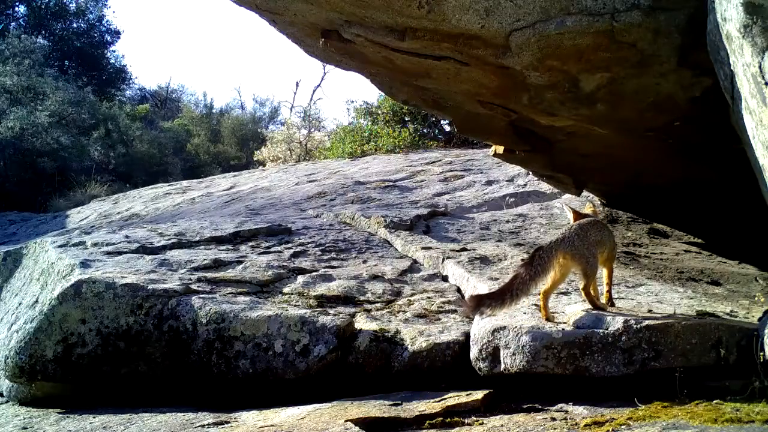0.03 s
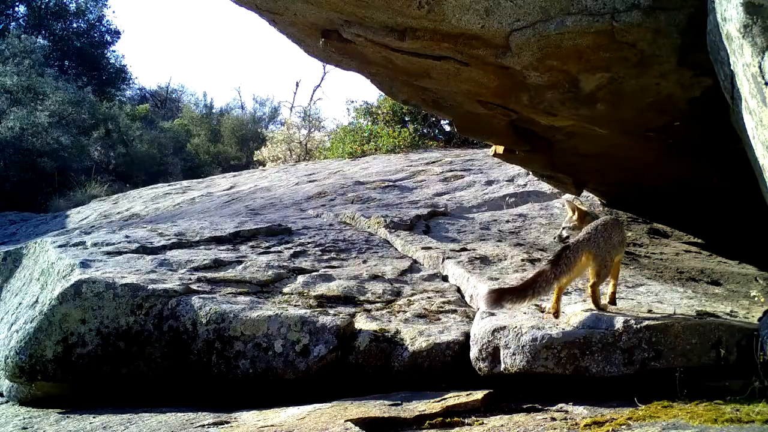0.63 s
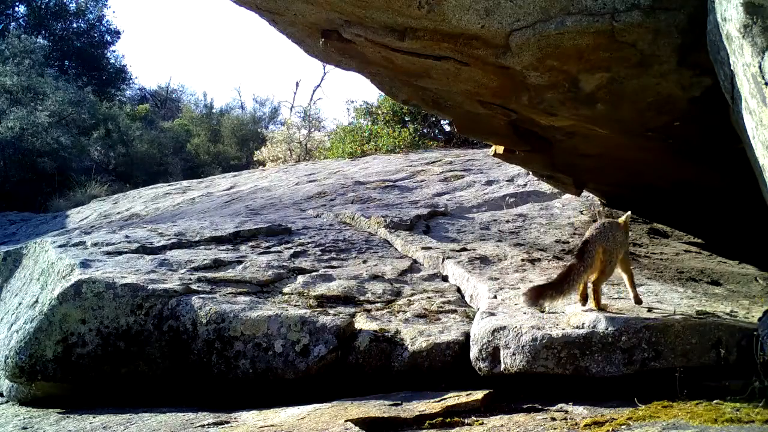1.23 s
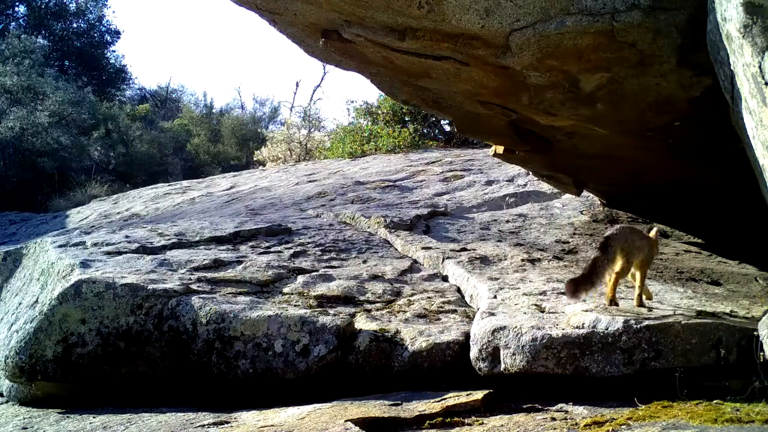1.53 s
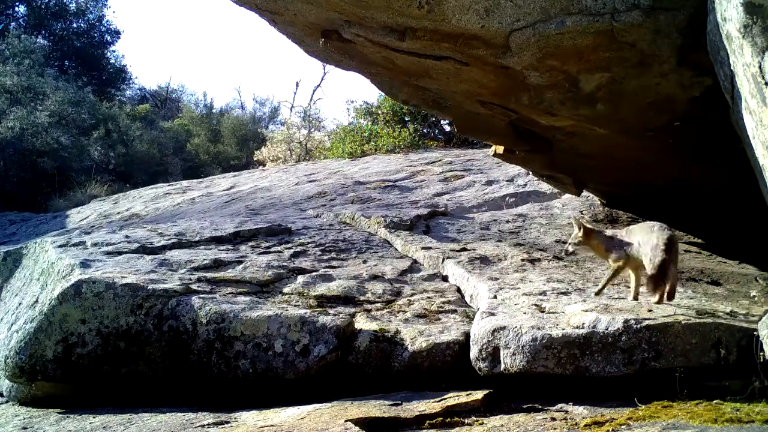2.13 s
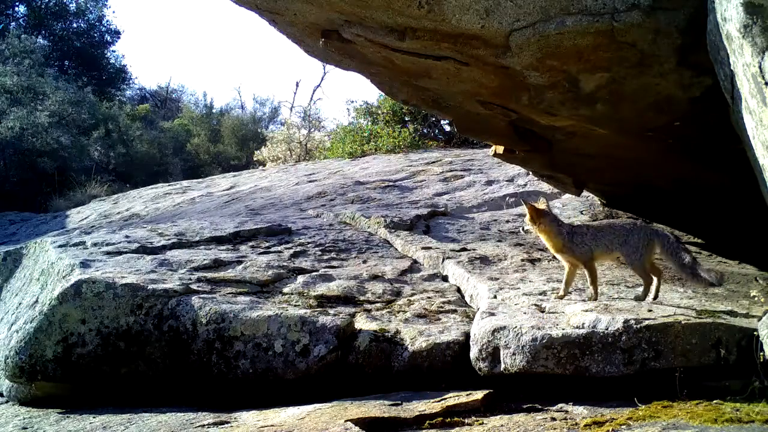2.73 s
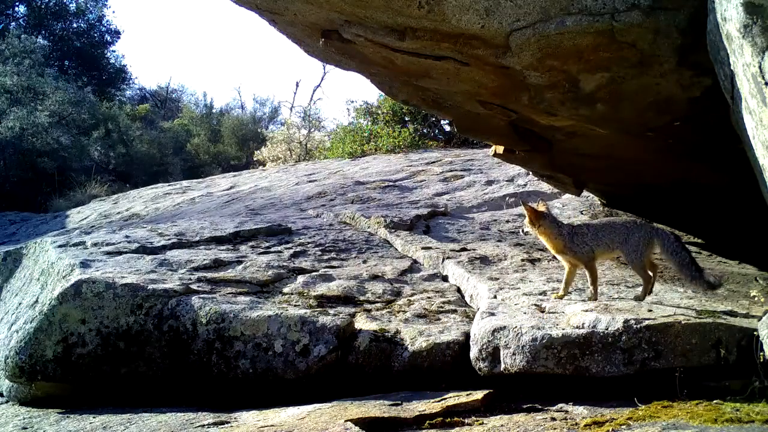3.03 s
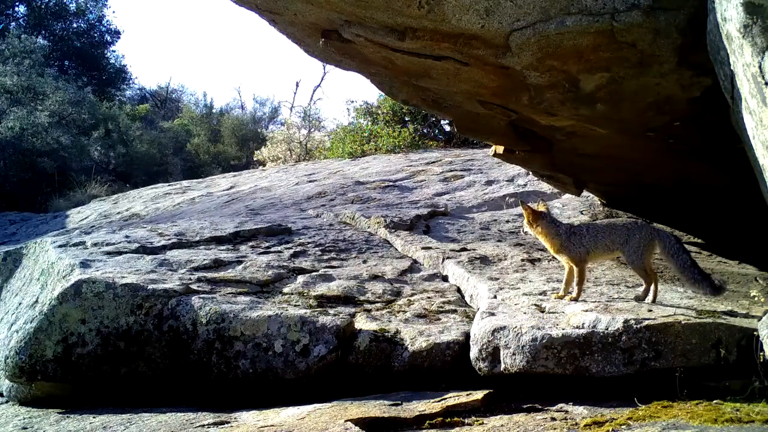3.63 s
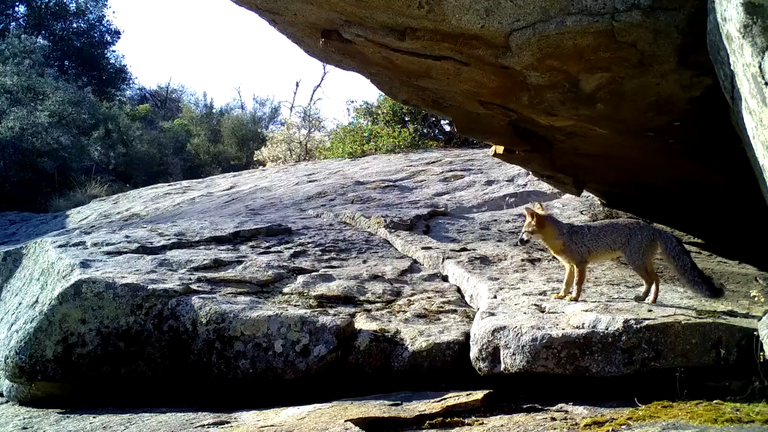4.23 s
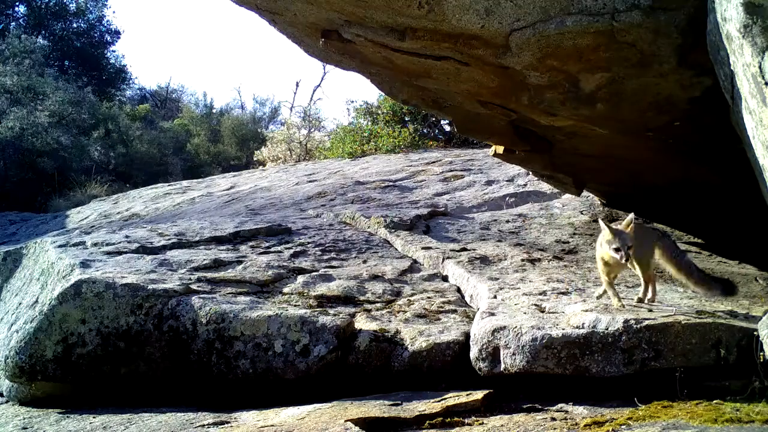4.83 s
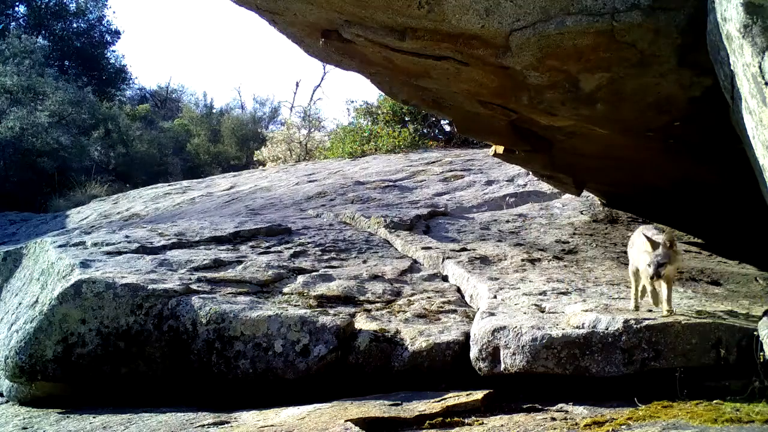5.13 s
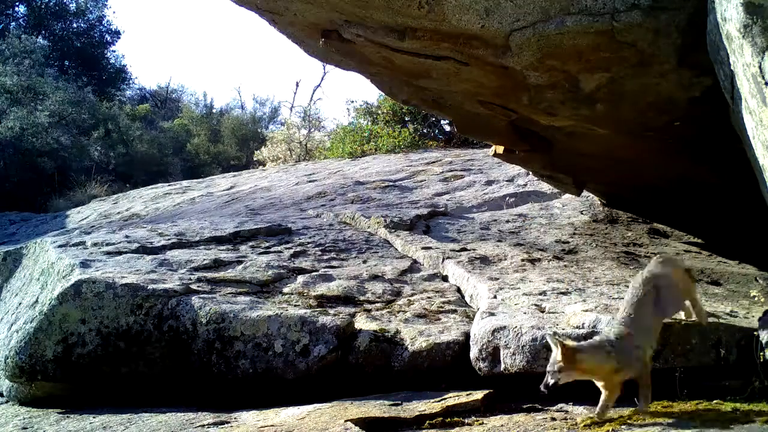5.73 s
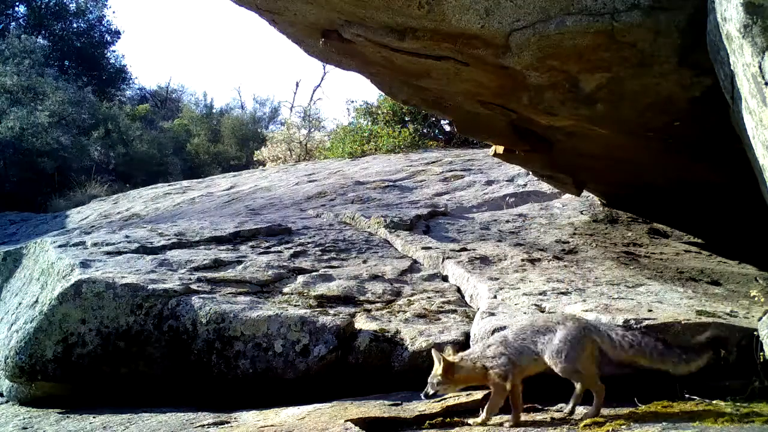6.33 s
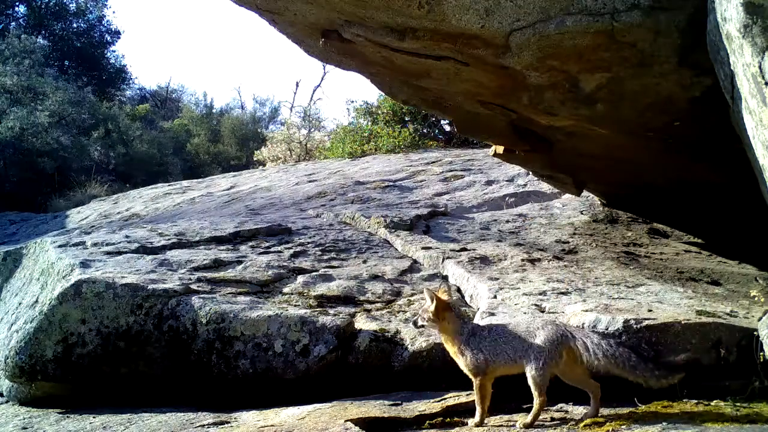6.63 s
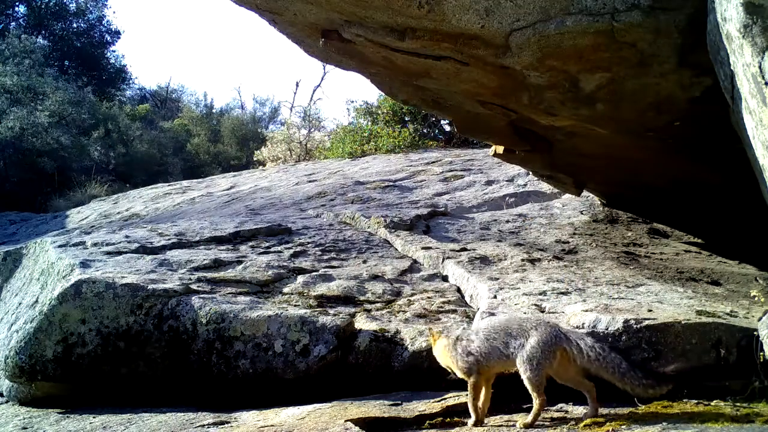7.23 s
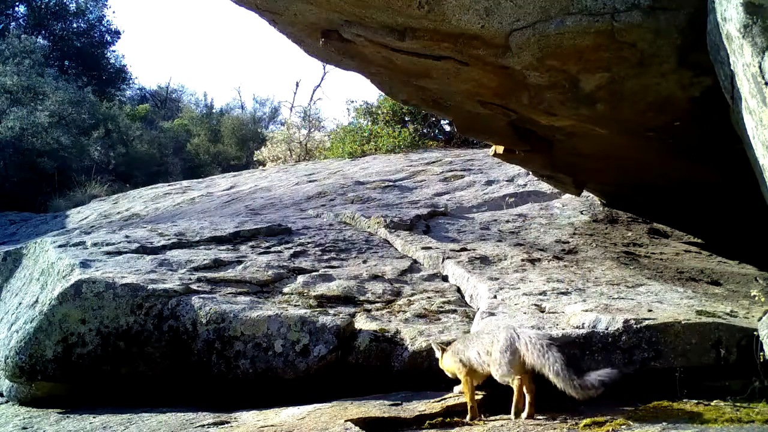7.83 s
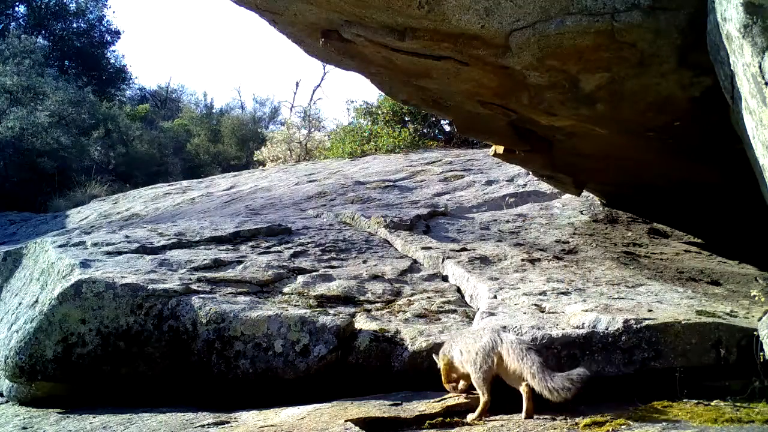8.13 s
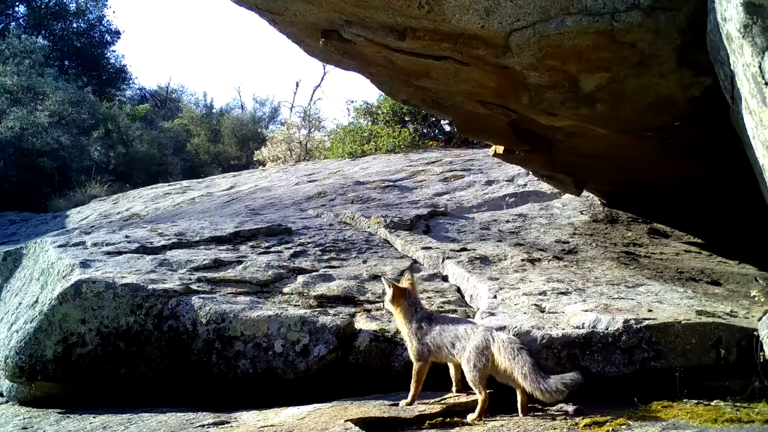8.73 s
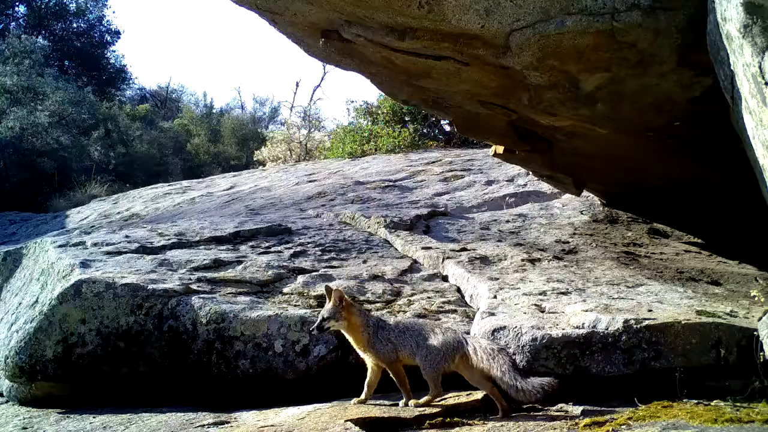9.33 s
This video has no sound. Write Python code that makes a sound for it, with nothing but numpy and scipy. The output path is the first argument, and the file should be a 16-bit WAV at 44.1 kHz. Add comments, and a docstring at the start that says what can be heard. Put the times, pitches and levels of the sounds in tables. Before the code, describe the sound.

A ground squirrel repeats piercing, squeaky alarm chirps about once a second among rocks, while a fox's claws briefly scrape stone.

```python
"""A ground squirrel hidden among boulders gives alarm calls. Each is a piercing whistle that flips
up into a squeal as the voice breaks, followed by two softer notes that swoop down and back up.
The rocks throw the calls back, and they overload the microphone. A fox scrabbles down a ledge,
its claws catching and dragging grit. Far birds chirp and the air rumbles softly."""
import sys
import numpy as np
from scipy import signal
from scipy.fft import rfft, irfft
from scipy.io import wavfile
from scipy.ndimage import uniform_filter1d

SR = 44100
rng = np.random.default_rng(int(sys.argv[2]) if len(sys.argv) > 2 else 0)


def int16_out(signal):
    """Quantize to a 16-bit WAV file."""
    q = np.round(np.clip(np.atleast_2d(signal).T, -1, 1) * 32767)
    wavfile.write(sys.argv[1], SR, q.astype(np.int16))


N = 414540

# tone of the hillside air, from rumble to hiss: (frequency [Hz], relative level [dB])
AIR_SPECTRUM = [(12, -33.5), (20, 0.5), (240, -8.5), (300, -10.5), (355, -11.5), (444, -13), (482, -14),
                (674, -18), (843, -20), (1560, -27), (3810, -35.5), (5790, -36.5), (7230, -40),
                (14500, -44), (15800, -46.5)]
# far bird chirps: (time [s], start pitch [Hz], end pitch [Hz], relative level [dB])
BIRD_CHIRPS = [(.858, 6100, 5000, -57.5), (4.004, 4100, 3930, -55), (4.425, 5600, 6050, -56),
               (6.42, 3750, 3440, -53), (7.008, 6350, 5140, -52), (7.535, 3740, 3560, -49),
               (7.589, 3680, 3500, -52)]
# claws catching on the ledge: (time [s], relative level [dB])
CLAW_CATCHES = [(5.4912, -22), (5.5277, -37), (5.5666, -37), (5.5825, -26), (5.6007, -21), (5.6574, -36),
                (5.7067, -38), (5.748, -36)]
# tone of grit scraping on stone: (frequency [Hz], relative level [dB])
GRIT_SPECTRUM = [(1500, -30), (3000, -17.5), (5400, -6), (6300, 0.5), (7200, -8), (10000, -14.5),
                 (12000, -23), (15000, -31)]
# echoes from the rock faces: (delay [s], relative level [dB])
ROCK_ECHOES = [(.0032, -8.5), (.033, -28), (.063, -21)]
# tone of the crack in the voice: (frequency [Hz], relative level [dB])
CRACK_SPECTRUM = [(250, -21.5), (600, -5), (1500, -5.5), (3500, -5), (5000, -1), (9000, -12)]
# how a swoop swells and fades: (share of its length [0 to 1], relative level [dB])
SWOOP_LOUDNESS = [(0, -14), (.08, 2), (.2, -3.5), (.54, -7.5), (.68, -10.5), (.9, -15.5), (1, -30)]
# the swoop that ends each call: (length [s], start pitch [Hz], dip pitch [Hz], end pitch [Hz])
LAST_SWOOP = (.06, 9000, 5650, 7700)
# the squirrel's calls, with relative levels: (time [s], whistle length [s], whistle middle pitch [Hz],
# whistle end pitch [Hz], squeal pitch [Hz], whistle and squeal level [dB], crack level [dB],
# first swoop's dip pitch [Hz], first swoop level [dB], last swoop level [dB])
ALARM_CALLS = [(.264, .039, 4712, 4970, 10600, -4, -19, 7000, -11, -44),
               (1.371, .039, 4724, 4874, 10240, -3.5, -18, 7020, -12, -49),
               (2.497, 0.042, 4746, 4846, 10590, -3, -23.5, 6950, -14.5, -49),
               (3.503, .041, 4577, 4822, 10610, -5, -21, 7000, -15.5, -44),
               (4.588, 0.042, 4640, 4680, 10630, -6, -20, 7080, -16, -52),
               (5.967, .045, 4740, 4570, 10340, -2, -16.5, 6260, -4, -23),
               (7.099, .042, 4570, 4460, 10060, -3.5, -29.5, 6500, -13.5, -50.5),
               (8.286, .042, 4614, 4470, 9700, -2.5, -24.5, 6490, -6.5, -27),
               (9.264, 0.046, 4660, 4660, 10060, -4, -20.5, 5850, -11.5, -45)]

USUAL_SWOOP_DB, USUAL_DIP_HZ = -12, 6910   # an ordinary swoop; "push" is how many dB louder one is


def from_db(db):
    """Turn decibels into a number to multiply a sound by."""
    return 10 ** (np.asarray(db) / 20)


def unit_level(x):
    """Scale a sound so that its average strength (rms) is 1."""
    return x / np.sqrt(np.mean(x ** 2) + 1e-20)


def add(out, at_s, sound):
    """Mix a sound into out, starting at the given time."""
    place = out[max(round(at_s * SR), 0):][:len(sound)]
    place += sound[:len(place)]


def band(x, low_hz, high_hz):
    """Gently turn down everything outside a range of frequencies."""
    edges_hz = [low_hz, min(high_hz, .45 * SR)]
    return signal.sosfilt(signal.butter(2, edges_hz, "band", fs=SR, output="sos"), x)


def coloured(x, spectrum):
    """Shape a sound's lows and highs by a table, then scale it to strength 1."""
    hz, db = np.transpose(spectrum)
    bin_hz = np.maximum(np.fft.rfftfreq(len(x), 1 / SR), 1)
    gain = from_db(np.interp(np.log(bin_hz), np.log(hz), db))
    return unit_level(irfft(rfft(x) * gain, len(x)))


def wobble(size, per_s):
    """Drift between random values, mostly from -1 to 1, per_s times a second."""
    points = rng.standard_normal(4096)
    return np.interp(np.arange(size) / SR * per_s % len(points), np.arange(len(points)), points)


def voice_phase(hz, jitter, jitter_per_s=900, glide_s=.004):
    """Smooth a pitch and let it tremble by the share jitter; the sine of the result is a tone."""
    smooth_hz = uniform_filter1d(hz, max(int(glide_s * SR), 1), mode="nearest")
    return 2 * np.pi * np.cumsum(smooth_hz * (1 + jitter * wobble(len(hz), jitter_per_s))) / SR


def fade_ends(x, share):
    """Fade in and out; the two fades together take this share of the sound."""
    return x * signal.windows.tukey(len(x), share)


def air(level_db=-40):
    """The soft rumble and hiss of the open hillside."""
    return from_db(level_db) * coloured(rng.standard_normal(N), AIR_SPECTRUM)


def birds(chirp_s=.032, distance_db=-2, octave_db=-6):
    """Thin, far-off chirps; the lower ones also carry a tone an octave up."""
    out = np.zeros(N)
    for at_s, start_hz, end_hz, db in BIRD_CHIRPS:
        phase = voice_phase(np.linspace(start_hz, end_hz, int(chirp_s * SR)), jitter=.016)
        tone = np.sin(phase) + from_db(octave_db) * (start_hz < 3800) * np.sin(2 * phase)
        add(out, at_s, from_db(db + distance_db) * fade_ends(tone, .5))
    return out


def fox(grains_per_s=6000, claw_db=-10, claw_fade_s=.02, slide_db=-47, slide_fade_s=.22):
    """Each claw catches with a scratch, then the paw drags grit over stone, more after a hard catch."""
    t = np.arange(SR // 2) / SR
    grains = rng.standard_normal(N) * (rng.random(N) < grains_per_s / SR)
    hardest_db = max(db for _, db in CLAW_CATCHES)
    force = np.zeros(N)
    for at_s, db in CLAW_CATCHES:
        add(force, at_s, from_db(db + claw_db - 60 * t / claw_fade_s))
        add(force, at_s, from_db(slide_db + .46 * (db - hardest_db) - 60 * t / slide_fade_s))
    return force * coloured(grains, GRIT_SPECTRUM)


def rocks(x, near_db=-17, near_fade_s=.23, far_db=-47, far_delay_s=.15, far_spread_s=.28):
    """Sound scatters among boulders, echoes off rock faces and returns faintly from a wooded slope."""
    t = np.arange(SR) / SR
    near = band(rng.standard_normal(SR), 1700, 11000) * from_db(-60 * t / near_fade_s)
    far = band(rng.standard_normal(SR), 2000, 4800) * np.exp(-((t - far_delay_s) / far_spread_s) ** 2)
    scatter = (from_db(near_db) * unit_level(near) + from_db(far_db) * unit_level(far)) / np.sqrt(SR)
    echoes = np.zeros(SR)
    for delay_s, db in ROCK_ECHOES:
        echoes[round(delay_s * SR)] += from_db(db)
    dull_echoes = band(echoes, 300, 5800)
    return x + signal.fftconvolve(x, scatter + dull_echoes)[:N]


def pip(hz, length_s=.028, sag_hz=330, flutter_db=3):
    """A thin, slightly falling tone that swells and stops."""
    progress = np.linspace(0, 1, int(length_s * SR))
    level_db = np.interp(progress, [0, .52, 1], [-5, 1, -13]) + flutter_db * wobble(len(progress), 245)
    tone = np.sin(voice_phase(hz - sag_hz * progress, jitter=.014))
    return fade_ends(tone * from_db(level_db), .2)


def grunt(rasp_share, length_s=.025, from_hz=2900, to_hz=3900, rasp_db=-6):
    """A second, lower voice that rises a little, mixed with raspy noise."""
    size = int(length_s * SR)
    tone = np.sin(voice_phase(np.linspace(from_hz, to_hz, size), jitter=.077, jitter_per_s=2000))
    rasp = from_db(rasp_db) * unit_level(band(rng.standard_normal(size), 1000, 4200))
    return fade_ends((1 - rasp_share) * tone + rasp_share * rasp, .5)


def swoop(length_s, start_hz, dip_hz, end_hz, dip_jitter, flutter_db=4):
    """A high note sags, turning rough and fluttery, and climbs again as it fades."""
    progress = np.linspace(0, 1, int(length_s * SR))
    path_hz = [start_hz, .78 * start_hz + .22 * dip_hz, dip_hz,
               dip_hz, .12 * dip_hz + .88 * end_hz, end_hz]
    hz = np.interp(progress, [0, .2, .45, .58, .82, 1], path_hz)
    depth = np.clip(4 * (1 - dip_hz / start_hz), 0, 1)
    roughness = depth * np.interp(progress, [.1, .24, .42, .7, .9], [.058, 1, .96, .87, .1])
    tone = np.sin(voice_phase(hz, .0099 + dip_jitter * roughness, jitter_per_s=2400))
    level_db = np.interp(progress, *np.transpose(SWOOP_LOUDNESS))
    level_db += flutter_db * roughness * wobble(len(progress), 600)
    return fade_ends(tone * from_db(level_db), .05)


def after_note(length_s, start_hz, dip_hz, end_hz, db, grunt_db, dip_jitter, rasp_share):
    """A swoop with a grunt under it and a pip after it; both partly follow its loudness."""
    push_db = db - USUAL_SWOOP_DB
    out = np.zeros(SR // 2)
    add(out, 0, from_db(db) * swoop(length_s, start_hz, dip_hz, end_hz, dip_jitter))
    add(out, .011, from_db(grunt_db + .74 * push_db) * grunt(rasp_share))
    pip_at_s = .064 + .0004 * push_db
    pip_hz = 7450 + .25 * (dip_hz - USUAL_DIP_HZ)
    add(out, pip_at_s, from_db(-27 + .69 * push_db) * pip(pip_hz))
    return out


def crack(length_s=.017):
    """A short burst of noise as the voice flips into its high range."""
    size = int(length_s * SR)
    return coloured(rng.standard_normal(SR // 10), CRACK_SPECTRUM)[:size] * np.hanning(size)


def squeal(from_hz, top_hz, flip_s=.013, hold_s=.017, flutter_db=6.5):
    """The broken voice shoots up about an octave, rough on the way, and clears as it fades."""
    t = np.arange(int((flip_s + hold_s) * SR)) / SR
    stages_s = [0, .55 * flip_s, flip_s, flip_s + hold_s / 2, t[-1]]
    hz = np.interp(t, stages_s, [1.08 * from_hz, .77 * top_hz, .945 * top_hz, top_hz, top_hz])
    roughness = np.interp(t, stages_s, [.96, 1, .2, 0, 0])
    level_db = np.interp(t, stages_s, [-13, -2.5, -1, -6, -22])
    level_db += flutter_db * roughness * wobble(len(t), 1200)
    tone = np.sin(voice_phase(hz, jitter=.0095 + .13 * roughness, jitter_per_s=3000))
    return fade_ends(tone * from_db(level_db), .08)


def whistle(length_s, middle_hz, end_hz, start_hz=4150, rise_s=.0057, tail_s=.018,
            flutter_db=4, octave_db=-17.5, rasp_db=-31):
    """A piercing tone that scoops up, trembles, then dies away as the voice breaks."""
    t = np.arange(int((length_s + tail_s) * SR)) / SR
    path_hz = [.99 * start_hz, start_hz, .2 * start_hz + .8 * middle_hz,
               middle_hz, (middle_hz + end_hz) / 2, end_hz]
    hz = np.interp(t / length_s, [0, .11, .24, .42, .8, 1], path_hz)
    phase = voice_phase(hz, jitter=.011, jitter_per_s=1200)
    rasp = from_db(rasp_db) * unit_level(band(rng.standard_normal(len(t)), 3000, 10000))
    tone = np.sin(phase) + from_db(octave_db) * np.sin(2 * phase) + rasp
    level_db = np.interp(t, [0, rise_s, .92 * length_s, length_s, t[-1]], [-15, 3, 3, -5, -17])
    level_db += flutter_db * wobble(len(t), 350)
    return fade_ends(tone * from_db(level_db), .05)


def squirrel(pause_s=.0565, stutter_s=.094):
    """Each alarm is a whistle that cracks into a squeal, then stutters on in two ever softer notes."""
    out = np.zeros(N)
    for at_s, length_s, middle_hz, end_hz, top_hz, db, crack_db, dip_hz, first_db, last_db in ALARM_CALLS:
        break_at_s = at_s + length_s
        add(out, at_s, from_db(db) * whistle(length_s, middle_hz, end_hz))
        add(out, break_at_s, from_db(db) * squeal(end_hz, top_hz))
        add(out, break_at_s, from_db(crack_db) * crack())
        # pushed harder, the first swoop lasts longer, starts lower and climbs higher
        push_db = first_db - USUAL_SWOOP_DB
        first_swoop = (.052 + .0008 * push_db, 9495 - 150 * push_db, dip_hz, 9150 + 110.5 * push_db)
        grunt_db = crack_db - 6   # a hoarse call both cracks and grunts harder
        first_note = after_note(*first_swoop, first_db, grunt_db, dip_jitter=.06, rasp_share=.2)
        last_note = after_note(*LAST_SWOOP, last_db, grunt_db, dip_jitter=.025, rasp_share=.76)
        add(out, break_at_s + pause_s, first_note)
        add(out, break_at_s + pause_s + stutter_s, last_note)
    return out


def scene():
    """Squirrel and birds echo among the rocks, over the fox's paws and the air, in one channel."""
    return (rocks(squirrel() + birds()) + fox() + air())[None]


def record(dry, ceiling=.37, lopsided=.023, cutoff_hz=15850):
    """The microphone overloads, squashing loud peaks a little unevenly; the highest treble is cut."""
    fine = signal.resample_poly(dry, 4, 1, axis=-1) / ceiling   # 4 times the samples avoids stray tones
    squashed = fine / (1 + fine ** 4) ** .25
    uneven = ceiling * (squashed + lopsided * squashed ** 2)
    overloaded = signal.resample_poly(uneven, 1, 4, axis=-1)
    treble_cut = signal.firwin(401, cutoff_hz, window=("kaiser", 8), fs=SR)
    return signal.fftconvolve(overloaded, treble_cut[None], "same")


dry = scene()
out = record(dry)
int16_out(out)
```